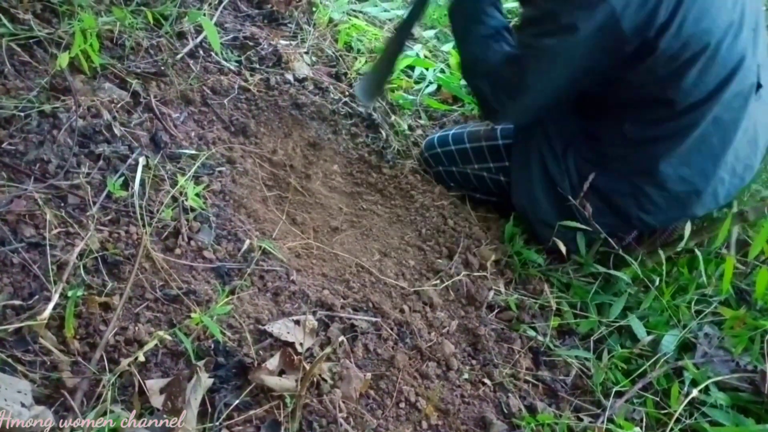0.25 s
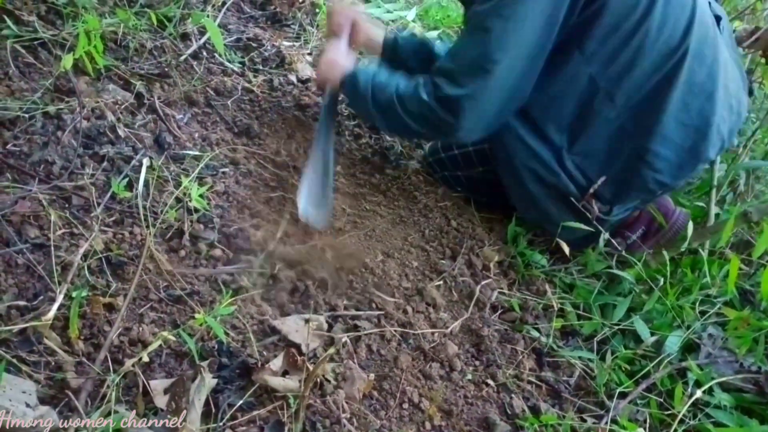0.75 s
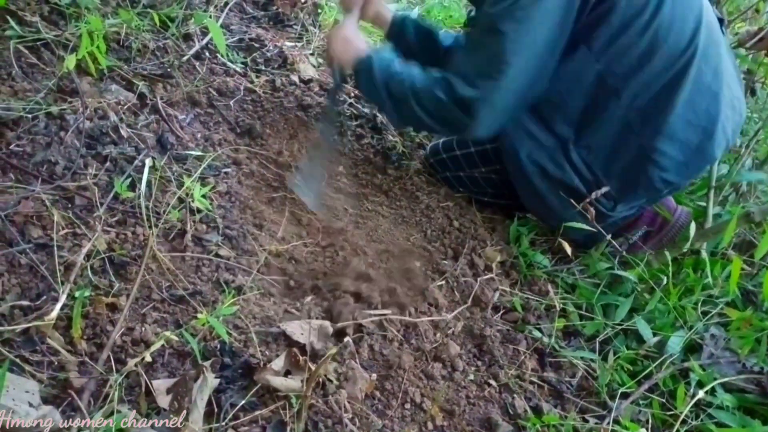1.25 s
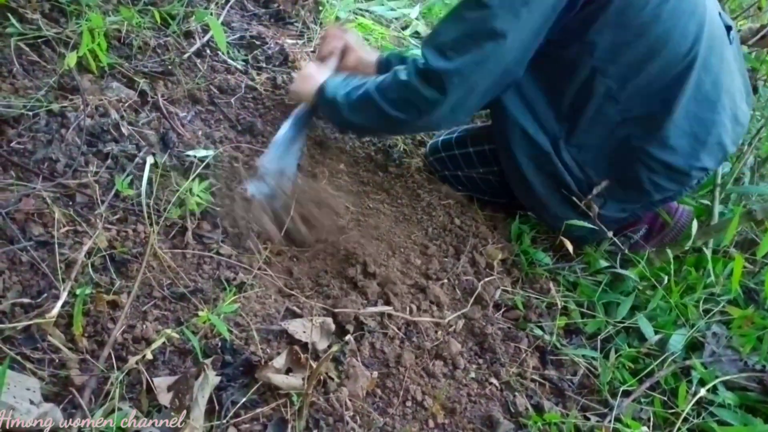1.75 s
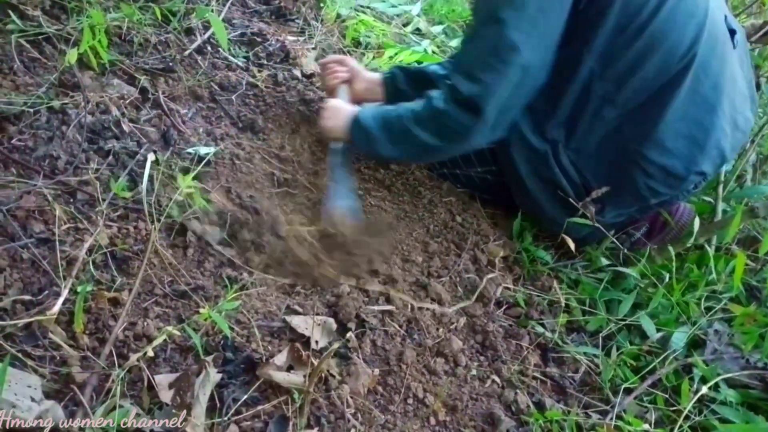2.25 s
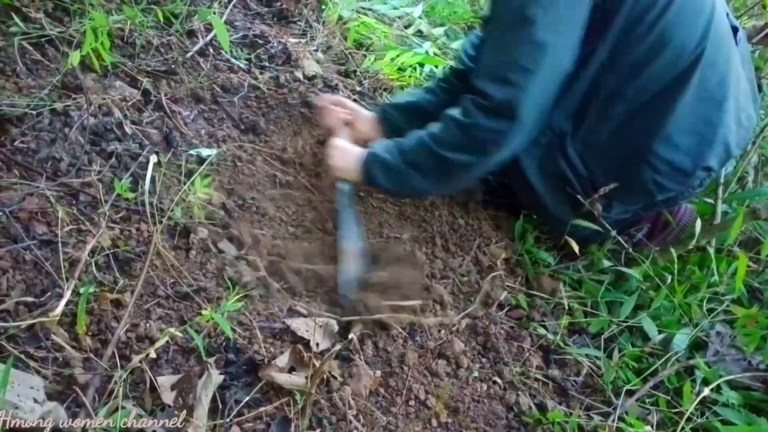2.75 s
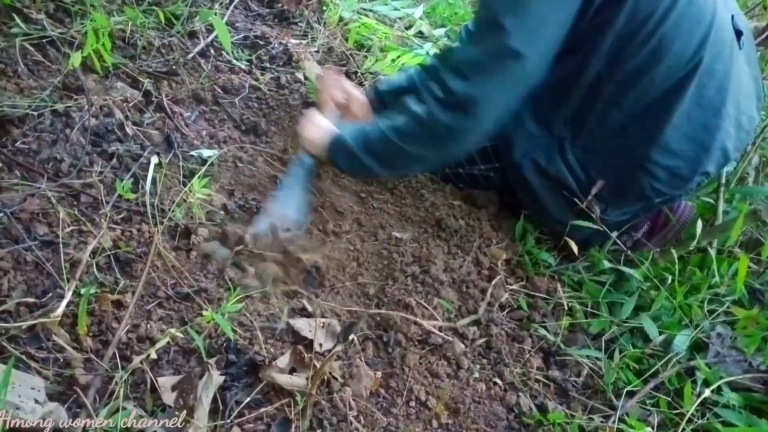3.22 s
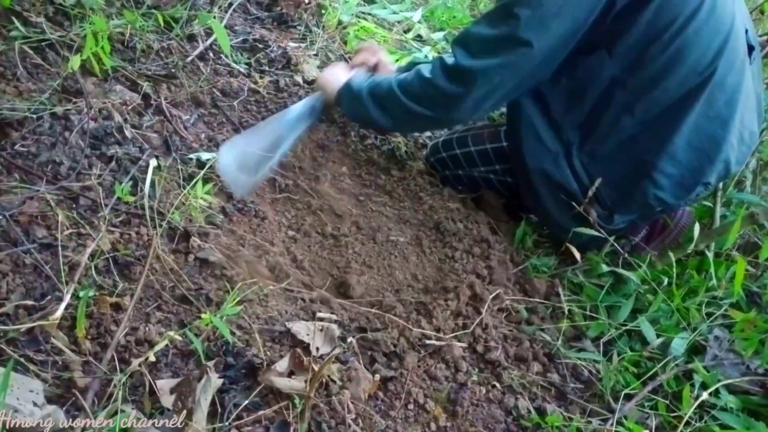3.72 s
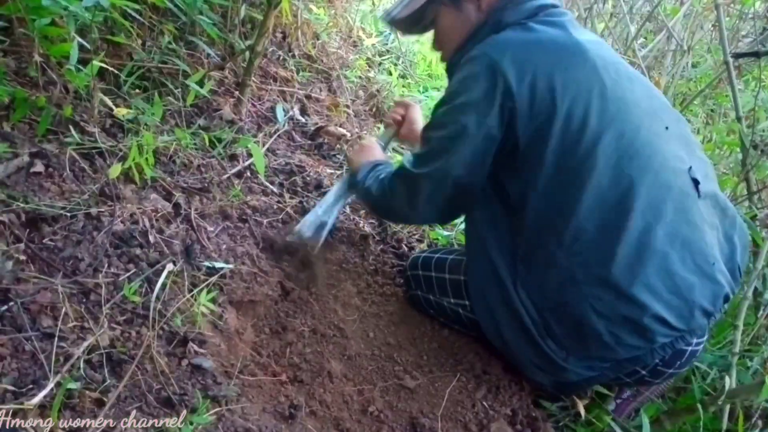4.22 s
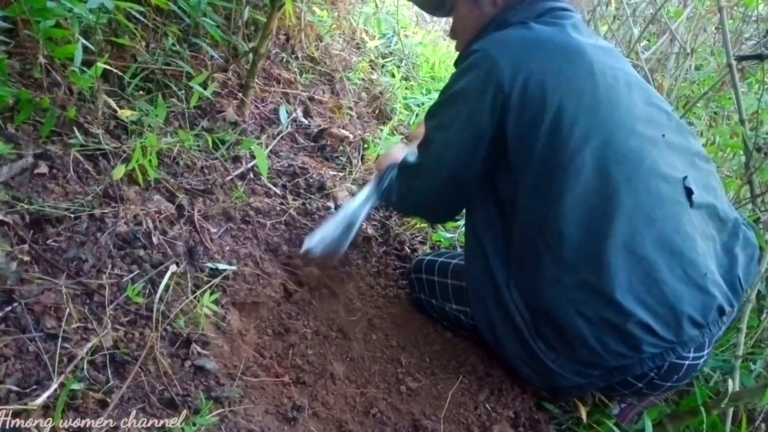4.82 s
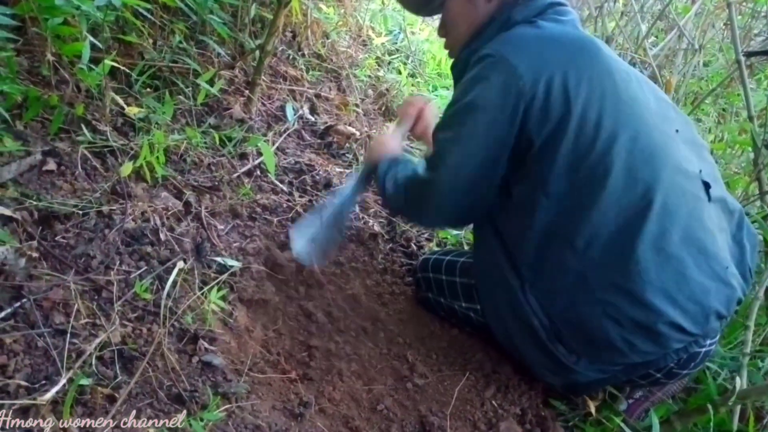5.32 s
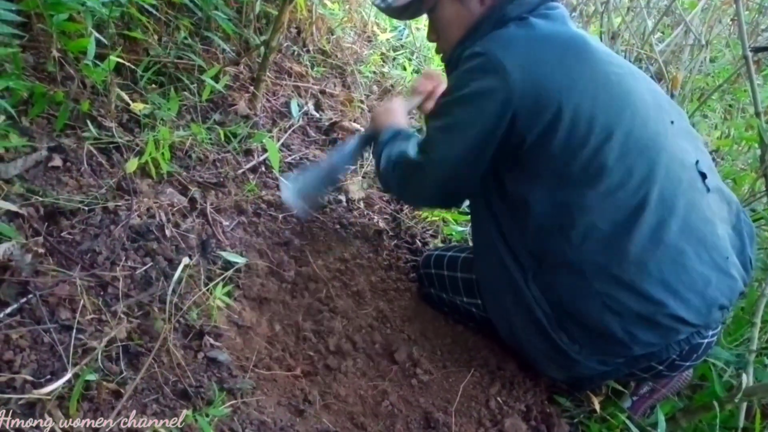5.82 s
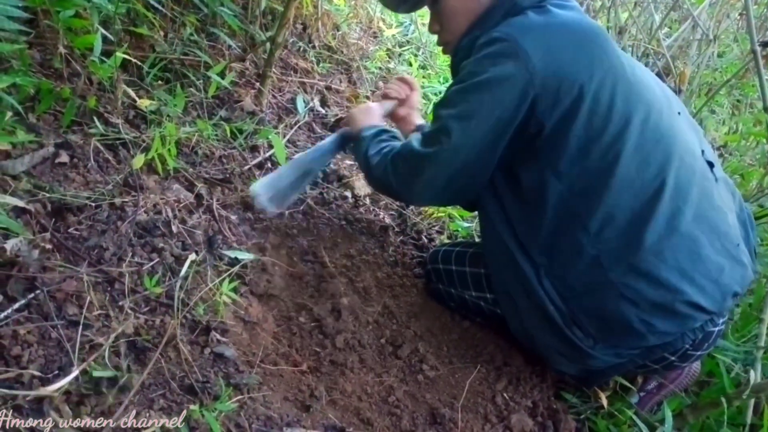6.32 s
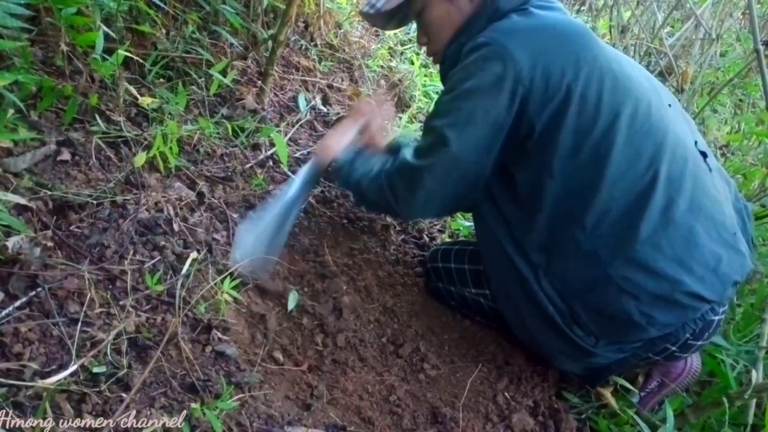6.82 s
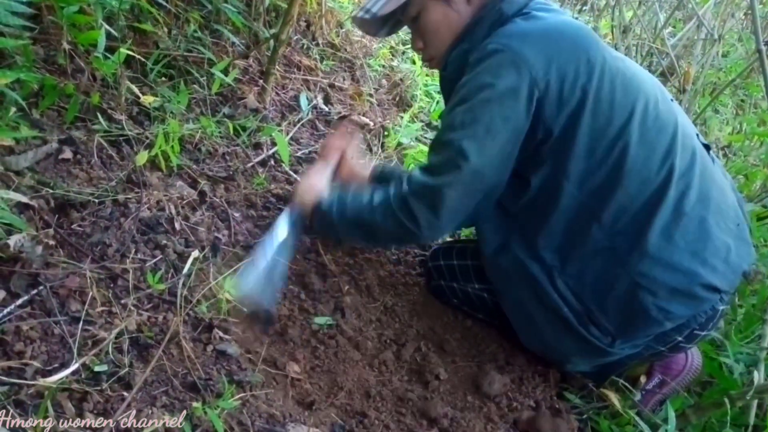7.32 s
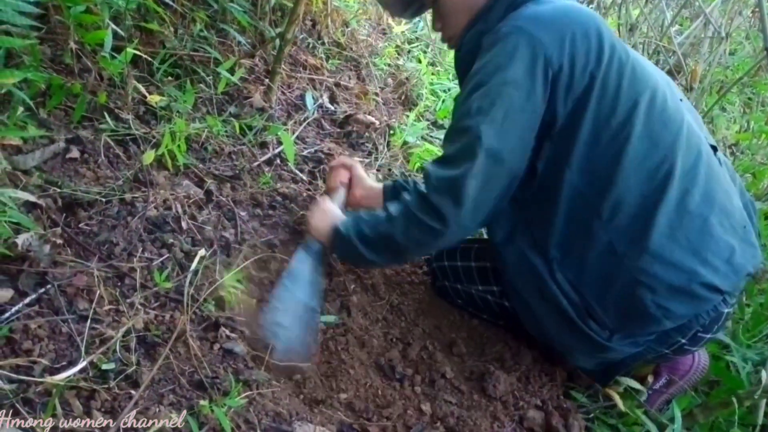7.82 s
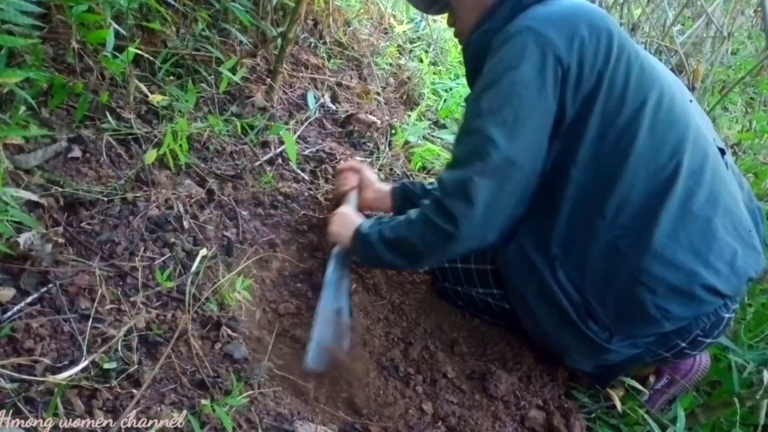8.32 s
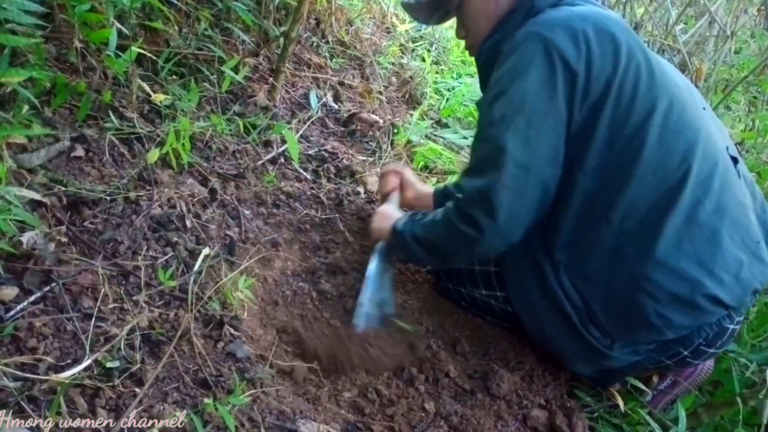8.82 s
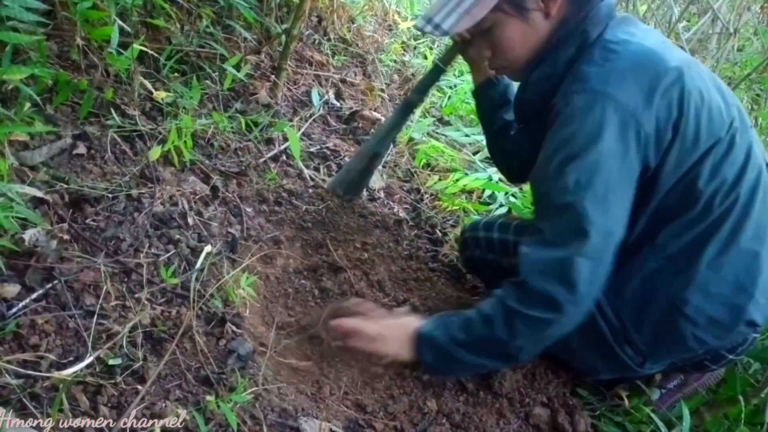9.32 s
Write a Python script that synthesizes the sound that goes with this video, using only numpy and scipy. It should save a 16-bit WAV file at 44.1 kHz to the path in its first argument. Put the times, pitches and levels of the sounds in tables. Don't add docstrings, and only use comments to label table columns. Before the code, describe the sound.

Steady close hacking of a metal blade into stony earth, each blow a gritty crunch, short clank and soft thud, then scattering crumbs.

```python
import sys
import numpy as np
from scipy import signal
from scipy.fft import rfft, irfft
from scipy.io import wavfile
from scipy.ndimage import uniform_filter1d

SR = 44100
rng = np.random.default_rng(int(sys.argv[2]) if len(sys.argv) > 2 else 0)


def makeup_ratio(level_db):
    decades = np.asarray(level_db, float) / 20
    return 10 ** decades


def dump_mix(stems):
    frames = np.atleast_2d(stems).T
    limited = np.clip(frames, -1, 1)
    pcm = np.round(limited * 32767).astype(np.int16)
    wavfile.write(sys.argv[1], SR, pcm)


N = 421596
MOVE_S = 3.9
FLAT_HZ = 2770


def evened(x):
    return x / np.sqrt(np.mean(x ** 2) + 1e-20)


def add(mix, s, sound):
    part = mix[round(s * SR):][:len(sound)]
    part += sound[:len(part)]


def colour(x, spectrum, low_db=0, high_db=0):
    hz = np.fft.rfftfreq(len(x), 1 / SR) + 1
    f, db = np.transpose(spectrum)
    low_shelf = low_db / (1 + (hz / 1900) ** 6)
    high_shelf = high_db / (1 + (4600 / hz) ** 8)
    shape_db = np.interp(np.log(hz), np.log(f), db) + low_shelf + high_shelf
    return evened(irfft(rfft(x) * makeup_ratio(shape_db), len(x)))


def lumpy(x, spread_db):
    octaves = np.log2(np.fft.rfftfreq(len(x), 1 / SR) / 100 + 1)
    ripple = np.interp(octaves, np.linspace(0, 8, num=36), rng.standard_normal(36))
    return evened(irfft(rfft(x) * makeup_ratio(spread_db * ripple), len(x)))


def clumps(spread_db):
    drift = evened(uniform_filter1d(rng.standard_normal(N), size=900))
    return evened(makeup_ratio(spread_db * drift))


# [f/Hz, level/dB per Hz]
HUSH_SPECTRUM = [(20, 8), (50, -6), (90, 1.5), (130, 4.5), (320, -6.5), (770, -3), (1180, -9.5), (1720, -9),
                 (2870, -15.5), (4660, -21), (6270, -37), (9400, -30), (12000, -46), (15700, -30)]
# [start t/s, length t/s, level/dB]
INSECT_PHRASES = [
    (5.92, .8, -79.5),
    (8.65, .3, -83),
    (8.92, .7, -79),
]
HUSH_DB, INSECT_HZ = -63, 4460


def forest():
    swell = makeup_ratio(1.5 * evened(uniform_filter1d(rng.standard_normal(N), size=6000)))
    hush = makeup_ratio(HUSH_DB) * colour(rng.standard_normal(N), HUSH_SPECTRUM) * swell
    t = np.arange(N) / SR
    waver_hz = 9 * evened(uniform_filter1d(rng.standard_normal(N), size=300))
    song = np.sin(2 * np.pi * np.cumsum(INSECT_HZ + waver_hz) / SR) * clumps(1.2)
    phrases = np.zeros(N)
    for s, length, db in INSECT_PHRASES:
        arch = abs(np.sin(np.pi * np.clip((t - s) / length, 0, 1)))
        phrases += makeup_ratio(db) * arch ** .5
    return hush + phrases * song


def grains(n, spread_db, size):
    jumps = np.minimum(rng.exponential(1, n // size + 1), 3)
    strength = np.repeat(makeup_ratio(spread_db * jumps), size)[:n]
    return evened(strength) * rng.standard_normal(n)


# [f/Hz, level/dB, time to fade 60 dB t/s]
BLADE_MODES = [(1570, -6, .04), (2380, -8, .06), (2785, 0, .11), (2970, -9, .06), (3260, -5, .08),
               (3460, -8, .06), (3680, -9, .13), (5170, -16, .05), (5750, -14, .05), (6160, -13, .05),
               (6600, -14, .06), (7050, -13, .05), (7650, -16, .05), (8100, -16, .05), (8650, -13, .06),
               (9030, -16, .05), (9750, -17, .05), (10680, -15, .05), (12020, -17, .05)]


def grip(low_db, high_db, spread_db):
    hz = np.array(BLADE_MODES)[:, 0]
    luck = rng.standard_normal(len(hz)) * (1 + (hz > 4400))
    return low_db * (hz < 2000) + high_db * (hz > 4400) + spread_db * luck


def blade(force, grip_db, damping=1):
    hz, db, t60 = np.transpose(BLADE_MODES)[:, :, None]
    hz = hz * (1 + .005 * rng.standard_normal(hz.shape))
    t = np.arange(SR // 6) / SR
    fade = makeup_ratio(db + np.reshape(grip_db, (-1, 1)) - 60 * damping * t / t60)
    ring = (fade * np.sin(2 * np.pi * hz * t)).sum(0)
    return signal.fftconvolve(force, ring / np.linalg.norm(ring))


def pecks(per_s, t60):
    hits = np.minimum(rng.exponential(1, N), 3) * (rng.random(N) < per_s / SR)
    keep = makeup_ratio(-60 / (np.clip(t60, .01, .2) * SR))
    return evened(signal.lfilter([1], [1, -keep], hits))


# [f/Hz, level/dB per Hz]
CRUMB_SPECTRUM = [(180, 0), (300, -3.5), (675, -17), (746, -1), (1620, -10), (2700, 5), (3680, 0.5),
                  (4530, -12.5), (6310, -3), (8350, -11), (10900, -9), (15700, -25)]


def specks(per_s):
    t, out = np.arange(400) / SR, np.zeros(N)
    strength = makeup_ratio(0.88 * np.minimum(rng.exponential(1, N), 3))
    hits = strength * (rng.random(N) < per_s / SR)
    which = rng.integers(16, size=N)
    for k, hz in enumerate(np.geomspace(4800, 13000, num=16)):
        ping = makeup_ratio(-60 * t / 0.034) * np.sin(2 * np.pi * hz * t)
        out += signal.oaconvolve(hits * (which == k), ping)[:N]
    return colour(out, CRUMB_SPECTRUM)


# [start t/s, peak level/dB, length t/s, blade ring level/dB]
SOIL_SPRAYS = [(0.302, -66.5, 0.21, 0.5), (0.508, -67, 0.34, -10), (0.95, -57.5, 0.41, -3.5),
               (1.575, -59.5, 0.41, -7), (2.07, -56, 0.29, 3), (2.606, -57, 0.49, -20),
               (3.173, -54, 0.36, -1.5), (3.385, -53, 0.37, -2), (4.016, -61.5, 0.19, -17),
               (5.03, -68, 0.44, 0.5), (5.548, -62, 0.31, -7), (5.89, -67.5, 0.41, -3),
               (6.216, -66.5, 0.25, -8), (6.843, -60.5, 0.35, -4), (7.15, -67, 0.79, -21),
               (7.72, -58.5, 0.16, 1), (8.168, -59.5, 0.46, -22), (8.638, -67.5, 0.45, 2),
               (9.033, -65, 0.5, -2.5)]
# [t/s, level/dB]
SOIL_CREEP = [
    (0, -64),
    (3.6, -62),
    (4.2, -70.5),
    (4.9, -71.5),
    (6.7, -71),
    (7.0, -61),
    (8.0, -68),
    (8.7, -71.5),
    (9.56, -65),
]
SPRAY_SKEW = 0.66
FINE_DB, FINE_CREEP_DB = (-6.5, -3.5), (-9.5, -7)
CREEP_RING_DB = -15


def patter():
    t = np.arange(N) / SR
    side = (t > MOVE_S).astype(int)
    start, db, length, ring_db = np.transpose(SOIL_SPRAYS)[:, :, None]
    steps = t[::200]
    progress = np.clip((steps - start) / length, 0, 1)
    arch = makeup_ratio(db) * np.sin(np.pi * progress ** SPRAY_SKEW) ** 2
    spray = np.interp(t, steps, arch.sum(0))
    creep = makeup_ratio(np.interp(t, *np.transpose(SOIL_CREEP)))
    on_steel = np.interp(t, steps, (arch * makeup_ratio(ring_db)).sum(0)) + creep * makeup_ratio(CREEP_RING_DB)
    dust = np.hypot(spray * makeup_ratio(FINE_DB)[side], creep * makeup_ratio(FINE_CREEP_DB)[side])
    coarse, small = grains(N, 2.8, size=90), grains(N, 3.8, size=30)
    landing = pecks(240, .025)
    dull = colour(coarse, CRUMB_SPECTRUM, -1.1, -3.7) * clumps(1.95) * (0.68 + 0.29 * landing)
    fine = colour(small, CRUMB_SPECTRUM, -41, 30) * clumps(1.1) * (0.58 + 0.51 * landing)
    fine = fine + 0.92 * specks(900)
    trickle = grains(N, 5, size=200) * clumps(2.5) * on_steel
    ringing = blade(trickle, grip(-2.6, 0.97, 0), damping=1.5)[:N]
    return dull * np.hypot(spray, creep) + fine * dust + ringing


# [f/Hz, level/dB per Hz]
GRIT_SPECTRUM = [(75, -28), (150, 5), (280, 4.5), (421, -5), (609, -1.5), (784, -2), (1640, -4.5),
                 (2420, -6.5), (3570, -3.5), (4340, -13), (6040, -4.5), (8250, -5.5), (8910, -8),
                 (11000, -8), (15700, -21.5)]
FLAT_LIFT_DB = -8.5


def cut(db, low_db, high_db, length, ring_db):
    t = np.arange(8192) / SR
    length = np.clip(length, .004, .12)
    push = (1 - np.exp(-t / 0.0035)) * (np.exp(-(t / length) ** 2.0) + 0.1 * np.exp(-t / 0.14))
    grit = grains(len(t), 2.6, size=130)
    crunch = colour(grit, GRIT_SPECTRUM, low_db + 6.0, high_db + 11.5)
    crunch = lumpy(crunch, 2) * push
    flat_db = FLAT_LIFT_DB * (abs(np.array(BLADE_MODES)[:, 0] - FLAT_HZ) < 100)
    reach_db = flat_db + grip(low_db + 8, high_db + 7, 2)
    sound = makeup_ratio(ring_db) * blade(grit * push, reach_db, damping=1.7)
    add(sound, 0, crunch)
    return makeup_ratio(db - 7.5) * sound


# [t/s, peak level/dB, low-mids level/dB, treble level/dB, length t/s]
FRONT_CUTS = [(0.4564, -31.5, -17.5, -21.5, 0.038), (0.929, -33.5, -13.5, -20.5, 0.033),
              (1.514, -29.5, -17, -18.5, 0.046), (1.788, -40, -34, -21, 0.068),
              (2.024, -35, -7, -13, 0.025), (2.034, -29.5, -14.5, -22, 0.03), (2.585, -31, -5, -15, 0.0089),
              (2.602, -43, -34, -15, 0.09), (2.793, -36.5, -57, -34, 0.0084),
              (3.1298, -35, -18, -22, 0.052), (3.701, -39, -20.5, -19.5, 0.027)]
# [t/s, peak level/dB, low-mids level/dB, treble level/dB, length t/s]
SIDE_CUTS = [(4.1187, -33.5, -2.5, -8.5, 0.033), (4.554, -34.5, -18, -15, 0.033),
             (4.9788, -33, -4.5, -9, 0.05), (5.438, -36, -8.5, -15, 0.071), (5.882, -34.5, -3, -13, 0.026),
             (5.9073, -42, -6.5, -15, 0.066), (6.318, -34, -7, -13.5, 0.048),
             (6.437, -46.5, -21, -17, 0.053), (6.763, -37, -15, -9, 0.018), (6.777, -33, -13.5, -18, 0.043),
             (7.184, -45.5, -16, -10, 0.081), (7.234, -39.5, -10.5, -12.5, 0.077),
             (7.309, -40, -3, -12, 0.021), (7.66, -38, -7.5, -13.5, 0.045),
             (8.101, -34.5, -15.5, -19, 0.032), (8.61, -42, -10.5, -15, 0.047),
             (9.0296, -38, -39, -17, 0.025)]
CUT_RING_DB, SHALLOW_RING, BURIED_RING_PER_S = -3.5, 0.084, -150


def cuts(digging):
    for s, db, low_db, high_db, length in FRONT_CUTS + SIDE_CUTS:
        ring_db = CUT_RING_DB - SHALLOW_RING * (db + 55.5) + BURIED_RING_PER_S * (length - .03)
        add(digging, s, cut(db, low_db, high_db, length, ring_db))


def slope(x):
    t = np.arange(SR // 3) / SR
    echoes = rng.choice([-1., 1.], len(t)) * (rng.random(len(t)) < .05) * (t > .004)
    echoes = signal.lfilter([1], [1, -.45], echoes * makeup_ratio(-60 * t / 0.18))
    return signal.fftconvolve(x, echoes / np.linalg.norm(echoes))[:N]


def slip(db, hz, t60):
    t = np.arange(4096) / SR
    flutter, waver = uniform_filter1d(rng.standard_normal((2, len(t))), size=160, axis=1)
    turns = np.cumsum(hz * (1 + .007 * evened(waver))) / SR
    fade_db = -60 * t / np.clip(t60, .008, .2) + 2.4 * evened(flutter)
    fade = (1 - np.exp(-t / .0008)) * makeup_ratio(fade_db)
    return makeup_ratio(db + 3.0) * fade * np.sin(2 * np.pi * turns)


# [t/s, peak level/dB, mode f/Hz, time to fade 60
# dB t/s]
EDGE_SLIPS = [(0.4615, -31, 2770, 0.027), (0.468, -33, 2850, .025), (0.47, -35, 3220, 0.022),
              (.477, -32, 2800, 0.058), (.483, -36, 2800, .06), (.9315, -40, 2840, .02),
              (0.936, -31, 2850, 0.032), (0.946, -38, 2780, 0.044), (.957, -39.5, 2780, 0.058),
              (.995, -44, 2900, .01), (1.062, -44, 2770, 0.034), (1.076, -48, 2770, 0.058),
              (1.5116, -36, 3650, 0.047), (1.518, -31, 3710, 0.057), (1.521, -26, 2930, 0.025),
              (1.5312, -16, 2410, 0.0091), (1.539, -29, 2890, 0.02), (1.539, -30.5, 6200, 0.028),
              (1.6201, -38, 3590, 0.044), (1.6411, -43, 3720, 0.15), (2.0262, -38, 2870, .02),
              (2.0392, -36, 2800, 0.088), (2.048, -38.5, 3630, 0.082), (2.0655, -23.5, 3590, 0.026),
              (2.049, -43, 8740, .02), (2.105, -48, 10600, .04), (2.134, -49, 1200, 0.024),
              (2.174, -51, 1320, 0.039), (2.589, -33.5, 2794, 0.029), (2.6148, -43, 8710, .05),
              (2.6155, -45, 9600, 0.061), (2.605, -44, 2790, 0.17), (2.648, -48, 3240, 0.11),
              (2.662, -48, 3240, .1), (2.663, -43, 3690, 0.12), (3.1405, -37, 2770, 0.05),
              (3.139, -41, 1830, 0.022), (3.259, -41, 6600, .012), (3.2794, -39, 3280, 0.024),
              (3.7972, -50, 7050, 0.034), (1.694, -48.5, 2770, 0.11), (1.545, -46, 3750, 0.15),
              (2.795, -43, 2770, 0.067), (1.167, -44, 2770, 0.053), (2.0606, -27.5, 3720, 0.031),
              (4.1204, -38, 2840, 0.045), (4.131, -37, 2840, 0.051), (4.1374, -34, 2740, 0.044),
              (4.571, -33, 2940, 0.037), (4.581, -38, 2870, 0.023), (4.9969, -36, 2820, .03),
              (5.0103, -31.5, 2400, 0.025), (5.012, -48, 3870, 0.081), (5.441, -42.5, 2860, 0.065),
              (5.061, -55, 2780, 0.14), (5.15, -59, 2800, 0.16), (5.447, -38.5, 2770, 0.035),
              (5.5088, -32, 6800, 0.022), (5.512, -41.5, 4030, 0.056), (5.8879, -42, 2840, .04),
              (5.9145, -43.5, 2820, 0.053), (6.3223, -50, 2750, .05), (6.338, -56, 8650, 0.081),
              (6.355, -39, 2760, .04), (6.3693, -32.5, 3560, 0.024), (6.3677, -38, 6500, .025),
              (6.461, -46, 2770, 0.093), (6.464, -50, 6580, 0.082), (6.4661, -48, 3320, 0.067),
              (6.468, -52, 12020, .05), (6.465, -47, 10680, 0.044), (6.5185, -47.5, 1380, .025),
              (6.548, -52, 12020, .06), (6.547, -36, 8620, 0.019), (6.78, -38, 2795, 0.076),
              (6.8008, -41, 3700, 0.065), (6.8097, -34.5, 2820, 0.048), (6.802, -41, 6500, .03),
              (6.806, -37.5, 8570, .03), (7.1914, -48, 2780, .04), (7.2643, -35, 6950, 0.026),
              (7.263, -47, 2750, 0.092), (7.278, -46, 2770, 0.037), (7.3057, -37.5, 6500, 0.021),
              (7.3057, -40, 9100, .02), (7.3072, -39, 2870, .04), (7.311, -44, 3200, 0.043),
              (7.327, -50, 6500, .03), (7.66, -45, 2790, .08), (8.1039, -52, 2800, 0.054),
              (8.1386, -26.5, 2980, 0.018), (8.2116, -48, 8500, .02), (8.617, -44.5, 2760, 0.1),
              (9.0313, -45.5, 3600, 0.11), (9.0295, -46, 2760, 0.054)]


def slips(digging):
    for s, *controls in EDGE_SLIPS:
        add(digging, s, slip(*controls))


def thud(db, hz, t60):
    t = np.arange(8192) / SR
    turns = hz * (t + 0.000093 * (1 - np.exp(-t / 0.0079)))
    fade = makeup_ratio(db + 4.0 - 60 * t / np.clip(t60, .008, .4))
    return fade * (1 - np.exp(-t * hz / 0.5)) * np.sin(2 * np.pi * turns)


# [t/s, peak level/dB, f/Hz, time to fade 60 dB t/s]
HANDLE_RAPS = [(0.468, -42, 750, 0.021), (0.4998, -35.5, 3590, 0.048), (1.531, -30.5, 825, 0.014),
               (2.0615, -24.5, 3460, 0.029), (2.586, -50, 403, 0.015), (2.6155, -41, 3670, 0.063),
               (2.844, -40.5, 490, 0.0097), (3.458, -25, 456, 0.0058), (3.71, -38, 635, 0.011),
               (4.565, -26.5, 820, 0.02), (4.5661, -27.5, 1550, 0.025), (5.086, -40, 447, 0.015),
               (5.5089, -32.5, 1570, 0.021), (7.663, -32.5, 960, 0.012), (8.135, -41.5, 750, 0.029),
               (8.1376, -28, 1500, 0.009), (3.4565, -44, 1010, .007), (4.567, -34, 1186, 0.026),
               (8.14, -43, 395, 0.025), (.469, -39, 1140, 0.024), (.94, -43, 1320, 0.027),
               (5.917, -34.5, 1430, 0.017)]


def raps(digging):
    for s, *controls in HANDLE_RAPS:
        add(digging, s, thud(*controls))


# [t/s, peak level/dB, f/Hz]
GROUND_THUDS = [(0.47, -32, 264), (0.484, -34, 137), (0.945, -34.5, 222), (1.533, -27, 270),
                (2.041, -32, 164), (2.065, -25.5, 170), (2.586, -31.5, 167), (3.709, -47, 220),
                (4.142, -32.5, 151), (4.567, -26.5, 157), (4.994, -31, 180), (5.017, -36, 179),
                (5.451, -35.5, 200), (5.482, -37, 221), (5.509, -31, 166), (7.259, -35, 189),
                (7.28, -42, 227), (7.682, -33.5, 191), (8.135, -33, 209), (3.142, -42.5, 297),
                (5.892, -42.5, 190), (5.92, -40, 174), (6.79, -40, 149), (6.372, -40, 202),
                (9.035, -51, 362), (8.105, -44, 140), (4.572, -36, 288), (2.601, -47, 303)]


def thuds(digging):
    for s, db, hz in GROUND_THUDS:
        add(digging, s, thud(db, hz, t60=0.032))


def knock(db, hz, t60, ring_db):
    t = np.arange(4096) / SR
    tail = 0.72 * makeup_ratio(-60 * t / np.clip(t60, .008, .3))
    fade = (1 - np.exp(-t / 0.00047)) * (makeup_ratio(-60 * t / 0.0041) + tail)
    grit = grains(len(t), 1.2, size=24)
    near_db = 16 * np.exp(-(np.log(np.array(BLADE_MODES)[:, 0] / hz) / .05) ** 2)
    lift_db = 7 * np.tanh(np.log(hz / 4500) / .5)
    sound = makeup_ratio(ring_db) * blade(grit * fade, near_db + grip(6, 1, 3.2), damping=1.3)
    crack = colour(grit, GRIT_SPECTRUM, -6.5, lift_db)
    add(sound, 0, lumpy(crack, 3) * fade)
    return makeup_ratio(db - 13.5) * sound


# [t/s, peak level/dB, favoured mode f/Hz, ring level/dB]
HARD_STOPS = [(0.5004, -24, 3800, -26), (8.1045, -28, 6900, 8), (1.511, -36, 3550, 18.5),
              (1.5328, -10.5, 3600, -3.5), (2.0602, -13.5, 3450, -8.5), (2.6589, -19.5, 2960, 2),
              (3.1386, -32, 2770, 9), (4.1379, -24, 2820, -16), (4.5665, -13, 3150, -27),
              (5.011, -31, 2780, -10), (5.452, -37, 2770, 13.5), (5.5072, -17, 6400, -9),
              (5.916, -23, 2780, -6), (6.3689, -19, 6500, -4), (6.8, -17.5, 2780, -7),
              (7.2657, -22, 2780, -2), (7.3265, -25, 3240, -6), (7.6774, -27, 2770, 2),
              (8.1371, -18, 2960, -6)]


def stops(digging):
    for s, db, hz, ring_db in HARD_STOPS:
        add(digging, s, knock(db, hz, 0.061, ring_db))


# [t/s, peak level/dB, favoured mode f/Hz, ring level/dB]
PEBBLE_HITS = [(0.6686, -32, 3260, -5), (1.6197, -32, 3660, -9), (1.6407, -43, 3680, 5),
               (1.803, -30, 3270, 1), (1.846, -41, 2970, 6), (3.2819, -39, 3280, -3),
               (6.548, -52, 3680, 16), (6.548, -33.5, 12000, -16), (6.985, -31.5, 3700, -2),
               (7.7897, -30.5, 2900, -15), (8.2116, -40.5, 3700, 4), (8.2375, -30, 3700, -8),
               (8.9338, -40.5, 6150, 3.5), (9.063, -33, 3680, -8)]


def pebbles(digging):
    for s, db, hz, ring_db in PEBBLE_HITS:
        add(digging, s, knock(db, hz, 0.072, ring_db))


def tick(db, high_db, hz):
    t = np.arange(2048) / SR
    snap = colour(rng.standard_normal(len(t)), CRUMB_SPECTRUM, 4.6, 2.4 * (high_db + 15.0))
    snap = lumpy(snap, 3.5) * (makeup_ratio(-60 * t / 0.03) + 0.25 * makeup_ratio(-60 * t / 0.15))
    song = 1.35 * makeup_ratio(-60 * t / 0.026) * np.sin(2 * np.pi * hz * t)
    return makeup_ratio(db - 11.0) * (snap + song)


# [t/s, peak level/dB, f/Hz]
TWIG_SNAPS = [(0.7133, -43, 3220), (1.8796, -41, 8750), (2.3129, -40.5, 3220), (2.3348, -37, 2660),
              (2.8976, -40.5, 2980), (3.258, -40, 2680), (3.9487, -44.5, 7240), (3.9804, -42.5, 3230),
              (4.0731, -42, 7250), (4.3176, -45, 3180), (4.3433, -36, 3100), (4.4086, -42.5, 3050),
              (4.4202, -43, 3170), (0.694, -43, 2570), (5.1903, -43.5, 3200), (5.7222, -38.5, 5800),
              (6.0275, -47, 8800), (6.9432, -46, 3000), (7.504, -41, 2750), (7.5857, -56, 2970),
              (7.6117, -43, 2770), (7.8202, -42.5, 2750), (4.48, -50, 2900), (8.5036, -41, 6940),
              (8.523, -44, 2900), (8.7824, -46, 6960), (8.8225, -45, 7300), (9.2289, -43.5, 2870)]


def twigs(digging):
    for s, db, hz in TWIG_SNAPS:
        add(digging, s, tick(db, -11.5, hz))


# [t/s, peak level/dB, f/Hz]
LEAF_CRACKS = [(0.841, -61, 3200), (1.1912, -50, 6300), (1.9185, -46, 6231), (2.7891, -54, 7030),
               (2.8983, -40, 6590), (3.2141, -46, 6170), (3.7973, -48, 5800), (3.8322, -56, 7220),
               (4.2767, -46, 3000), (4.293, -53, 3200), (4.369, -53, 7000), (4.547, -49, 8090),
               (5.1377, -50, 6570), (5.326, -59, 8300), (5.8611, -46, 6800), (6.1868, -45, 6750),
               (6.2337, -44, 6280), (6.275, -53, 7000), (6.3016, -53, 8770), (6.415, -53, 8600),
               (6.5374, -43, 5350), (6.8962, -48, 5800), (6.9306, -51, 7160), (7.105, -48, 3900),
               (7.157, -47, 2970), (7.9533, -46, 6990), (8.0147, -52, 6540), (8.366, -43, 8300),
               (8.4786, -50, 6830)]


def leaves(digging):
    for s, db, hz in LEAF_CRACKS:
        add(digging, s, tick(db, 1, hz))


# [t/s, peak level/dB, ring level/dB]
CLOD_HITS = [(0.9937, -55, 3), (1.0624, -55, 8), (1.1676, -48, 6), (1.694, -39.5, 8), (2.1059, -28.5, 3),
             (2.165, -40, 16.5), (2.203, -38.5, 4), (3.2, -32.5, 5.5), (3.743, -39, -1), (3.7978, -40.5, 6),
             (5.041, -46, 12), (5.1383, -51, 7), (6.465, -40, 11), (6.5205, -34, -10), (7.0503, -34, -1.5),
             (7.729, -38.5, 5), (8.6984, -41, 6), (8.75, -46, 6), (8.9626, -37.5, -3)]


def clods(digging):
    for s, db, ring_db in CLOD_HITS:
        add(digging, s, knock(db, FLAT_HZ, 0.081, ring_db))


def swing(digging):
    start_s, length_s, level_db, hum_hz = 2.47, .12, -70, 1620
    t = np.arange(0, length_s, 1 / SR)
    arch = np.sin(np.pi * t / length_s)
    add(digging, start_s, makeup_ratio(level_db) * arch * np.sin(2 * np.pi * hum_hz * t))


# [t/s, peak level/dB, f/Hz]
LUMP_DROPS = [(2.846, -37, 167), (3.284, -43, 78), (3.456, -44, 200), (3.632, -42, 89), (5.084, -49, 164),
              (5.09, -33, 80), (5.323, -37, 92), (6.083, -41, 89.5), (7.503, -36.5, 97), (7.774, -35, 124),
              (7.794, -34, 81.6), (8.869, -40, 100)]


def lumps(digging):
    for s, db, hz in LUMP_DROPS:
        add(digging, s, thud(db, hz, t60=2.86 / hz))


def body_shade(digging):
    highpass = signal.butter(2, 11500, "highpass", fs=SR, output="sos")
    top = signal.sosfiltfilt(highpass, digging)
    return digging + top * (makeup_ratio(-12) - 1) * (np.arange(N) / SR > MOVE_S)


def scene():
    digging = np.zeros(N)
    for source in (cuts, slips, raps, thuds, stops, pebbles, twigs, leaves, clods, swing, lumps):
        source(digging)
    digging = body_shade(digging)
    return (digging + makeup_ratio(-25.5) * slope(digging) + patter() + forest())[None]


def roll_off(x):
    return signal.sosfilt(signal.butter(12, 15660, fs=SR, output="sos"), x)


def record(dry):
    thin = signal.sosfilt(signal.butter(3, 62, "highpass", fs=SR, output="sos"), dry)
    thin = signal.oaconvolve(thin, signal.firwin(255, 15700, fs=SR)[None], "same")
    return roll_off(thin)


dry = scene()
out = record(dry)
dump_mix(out)
```